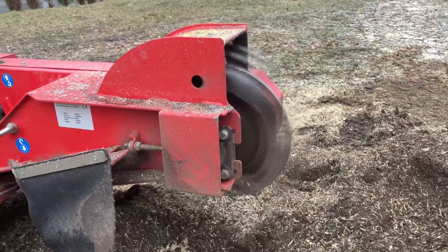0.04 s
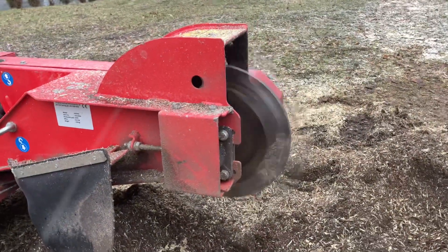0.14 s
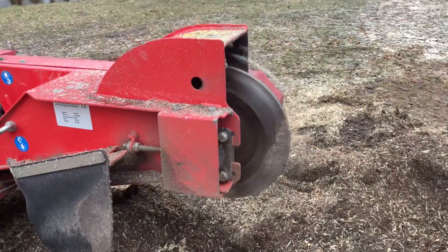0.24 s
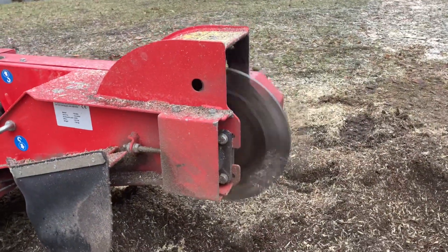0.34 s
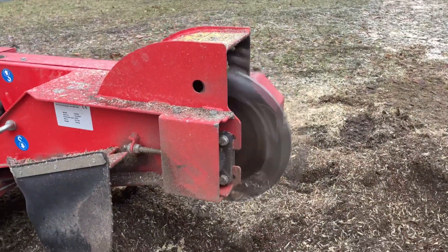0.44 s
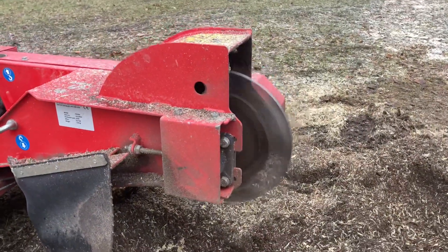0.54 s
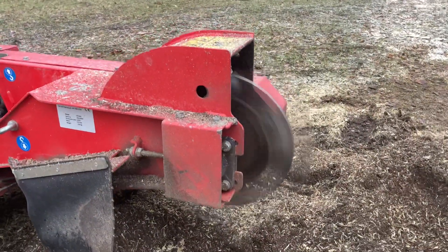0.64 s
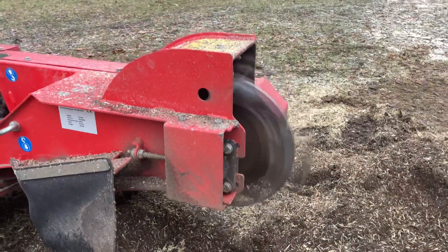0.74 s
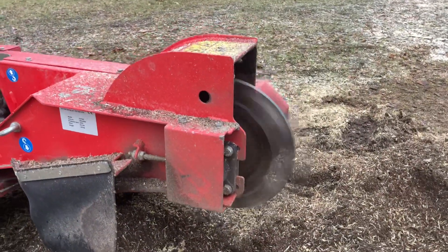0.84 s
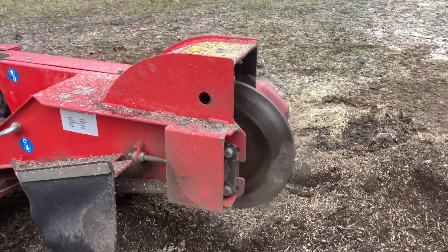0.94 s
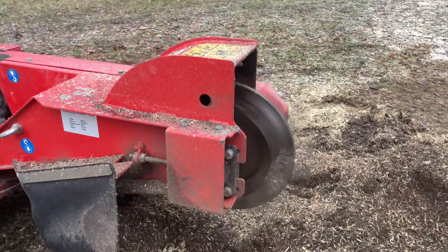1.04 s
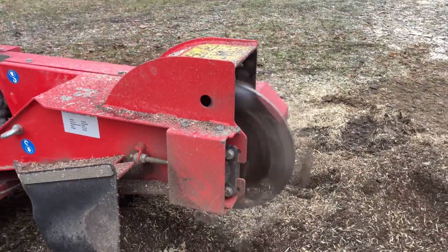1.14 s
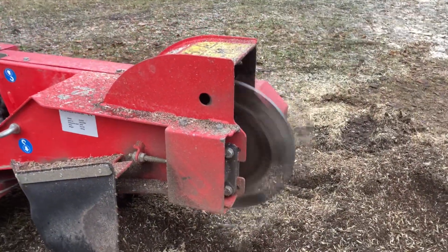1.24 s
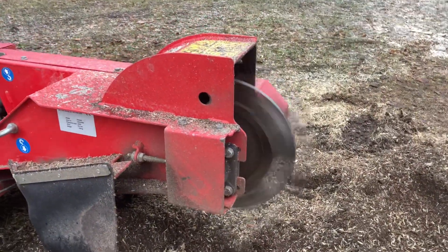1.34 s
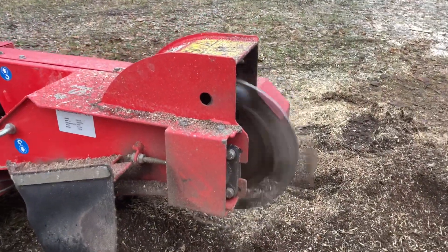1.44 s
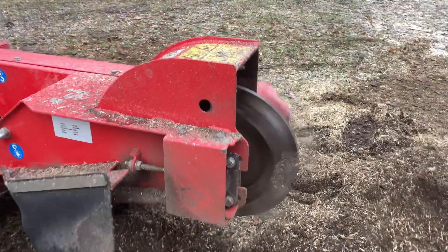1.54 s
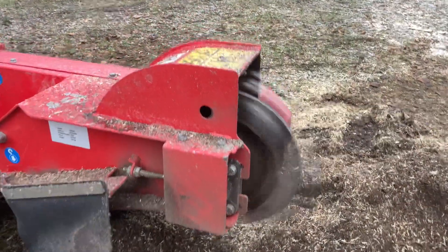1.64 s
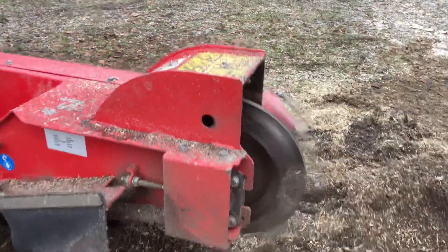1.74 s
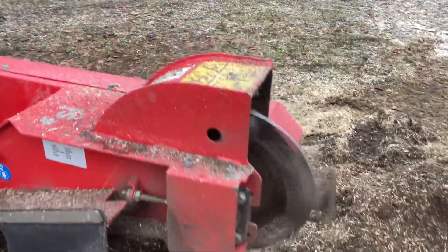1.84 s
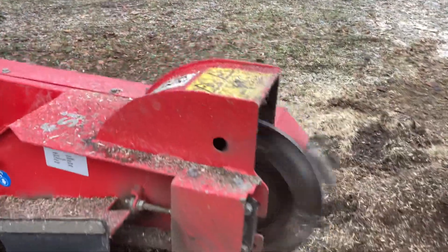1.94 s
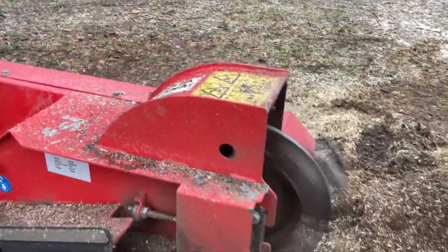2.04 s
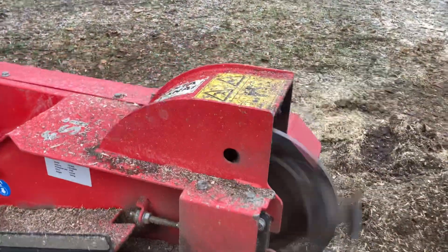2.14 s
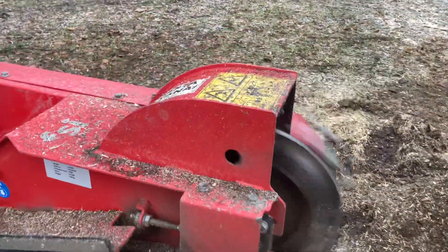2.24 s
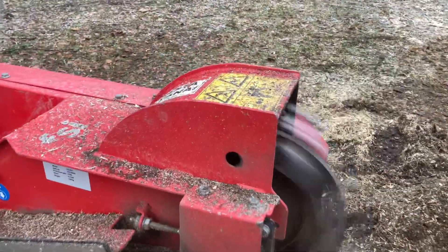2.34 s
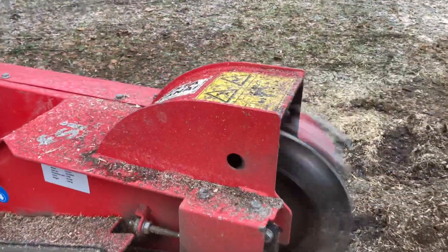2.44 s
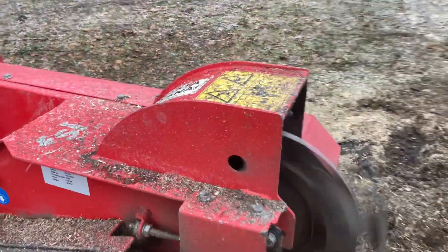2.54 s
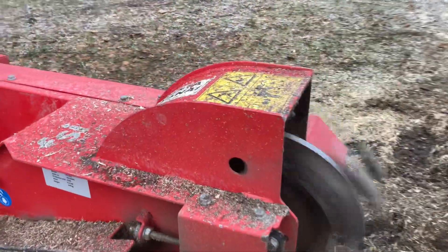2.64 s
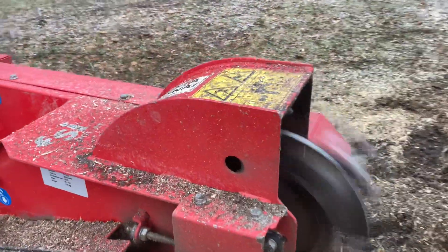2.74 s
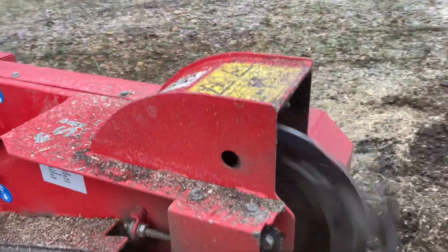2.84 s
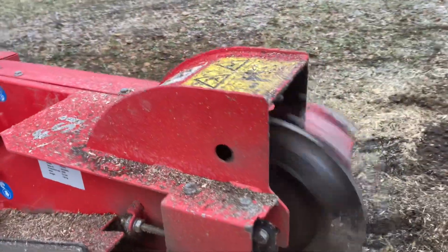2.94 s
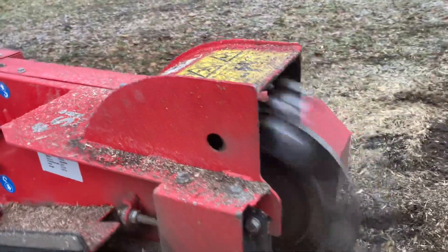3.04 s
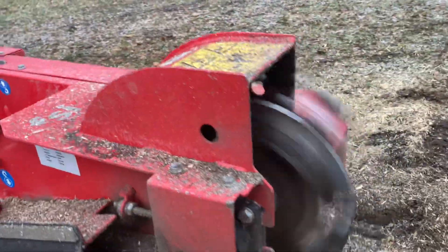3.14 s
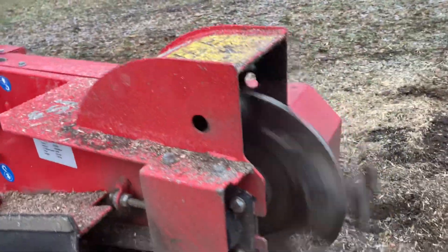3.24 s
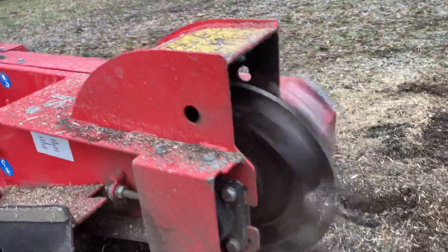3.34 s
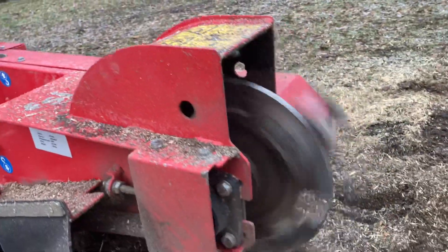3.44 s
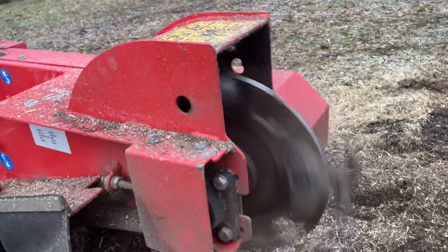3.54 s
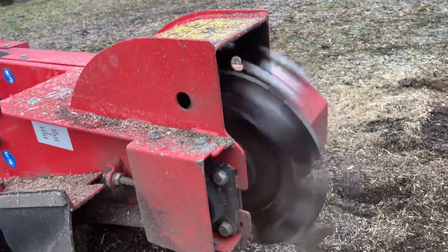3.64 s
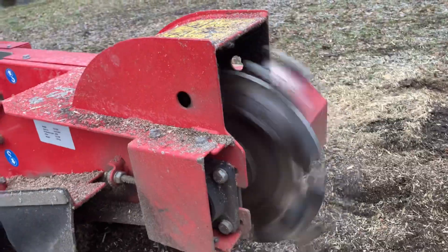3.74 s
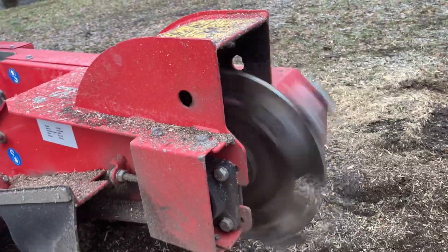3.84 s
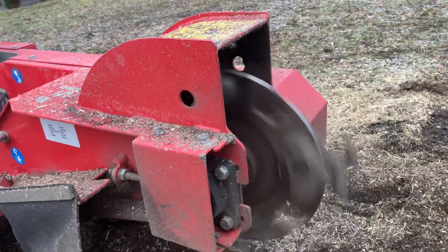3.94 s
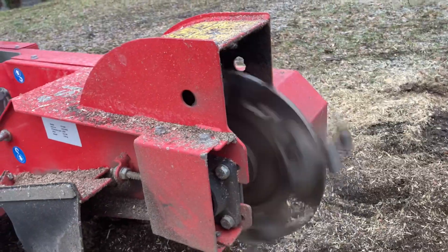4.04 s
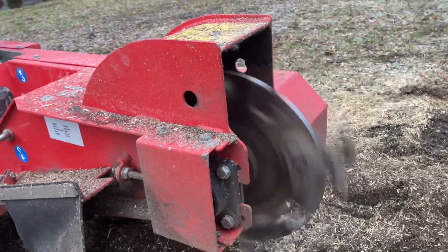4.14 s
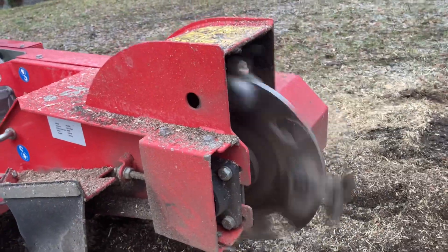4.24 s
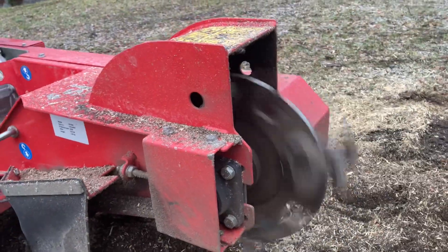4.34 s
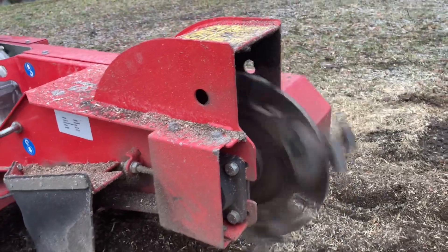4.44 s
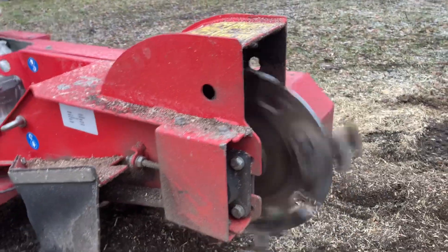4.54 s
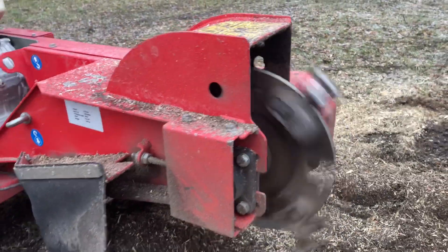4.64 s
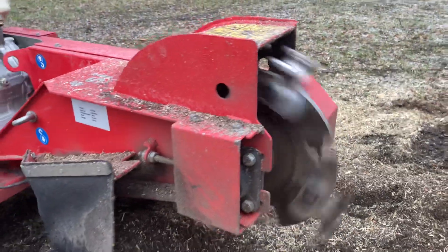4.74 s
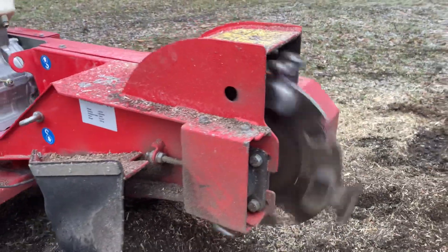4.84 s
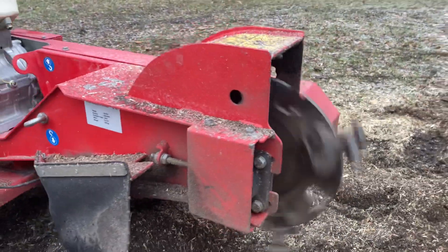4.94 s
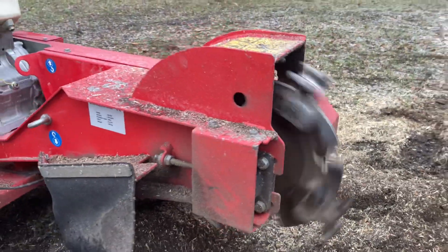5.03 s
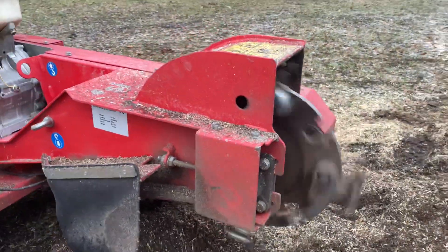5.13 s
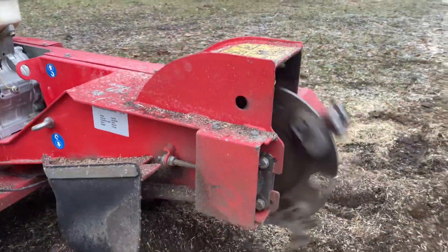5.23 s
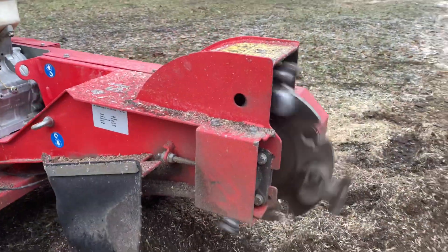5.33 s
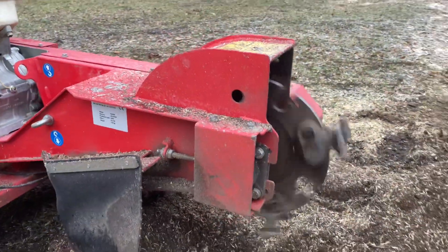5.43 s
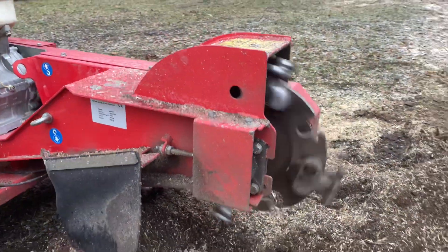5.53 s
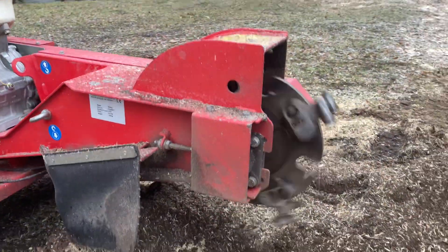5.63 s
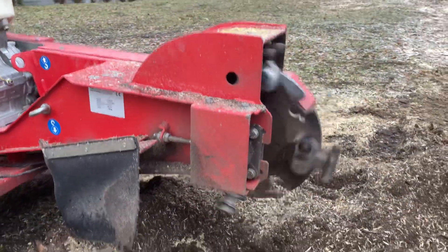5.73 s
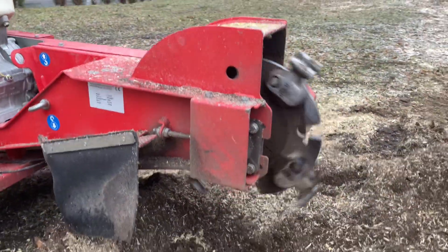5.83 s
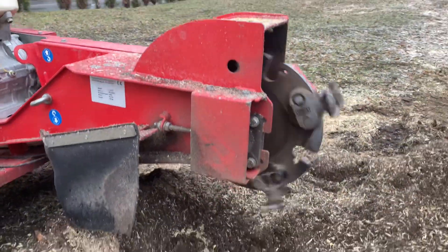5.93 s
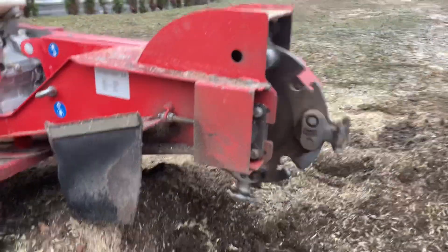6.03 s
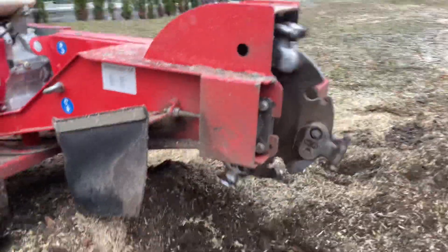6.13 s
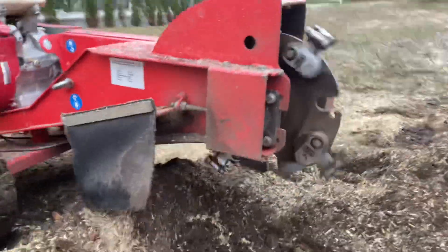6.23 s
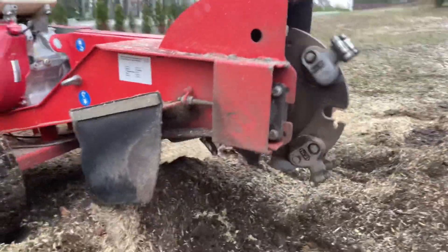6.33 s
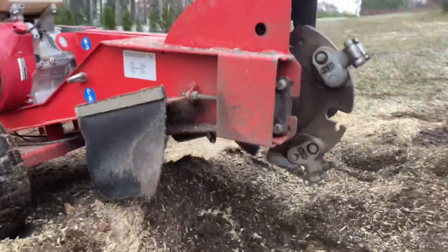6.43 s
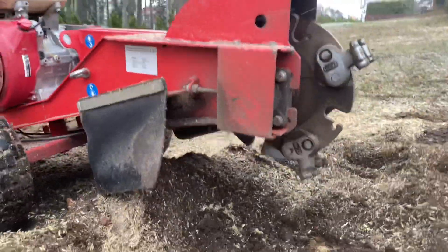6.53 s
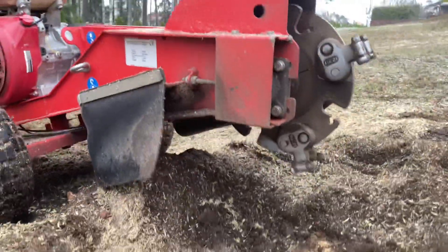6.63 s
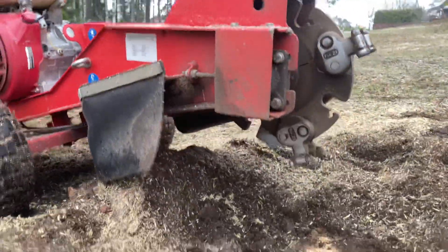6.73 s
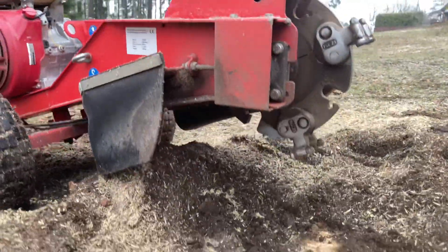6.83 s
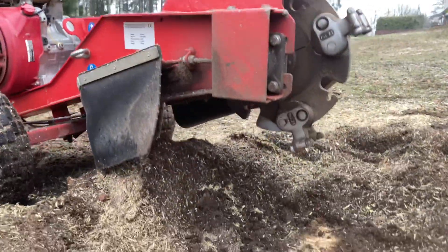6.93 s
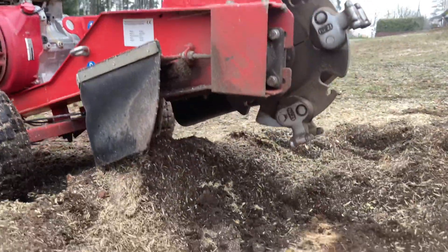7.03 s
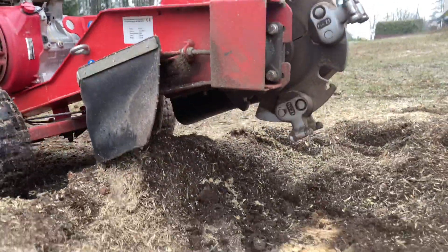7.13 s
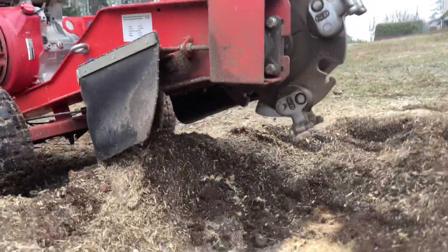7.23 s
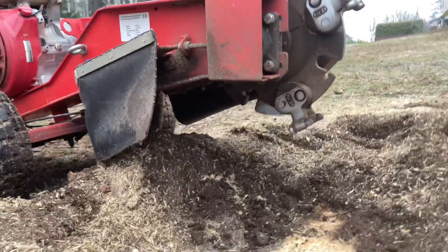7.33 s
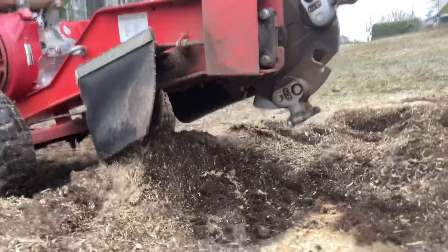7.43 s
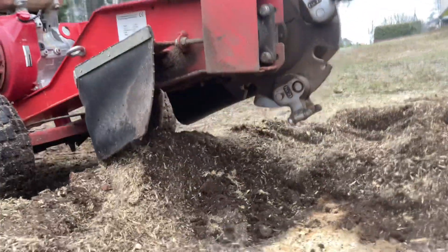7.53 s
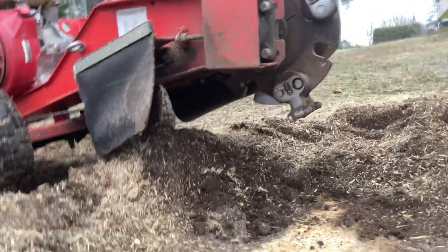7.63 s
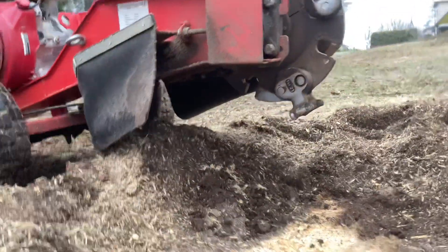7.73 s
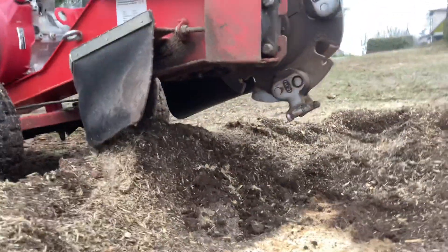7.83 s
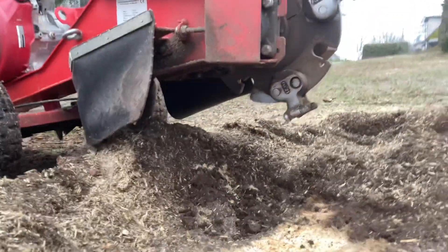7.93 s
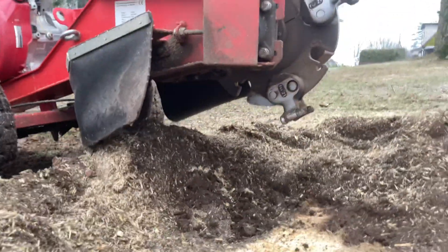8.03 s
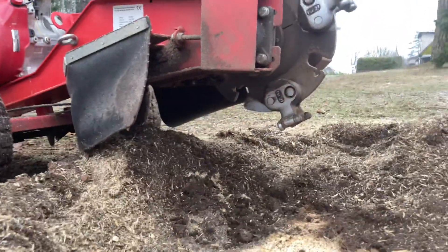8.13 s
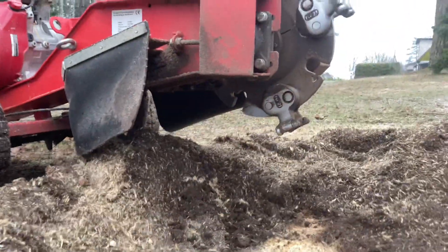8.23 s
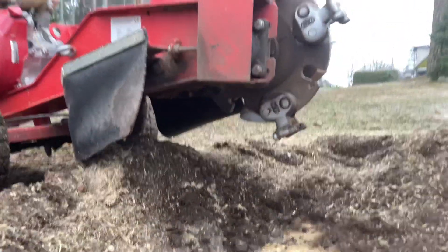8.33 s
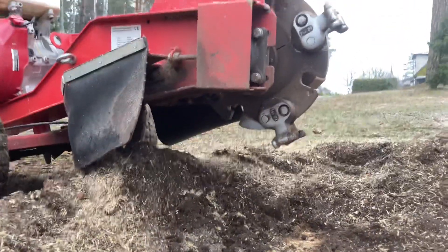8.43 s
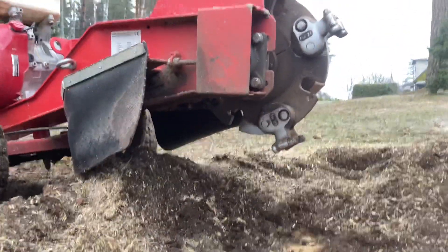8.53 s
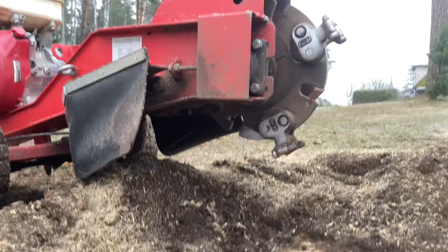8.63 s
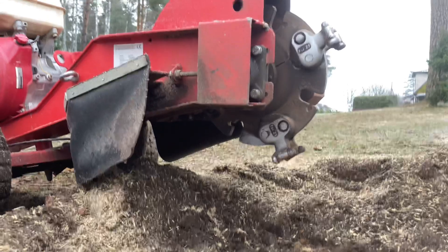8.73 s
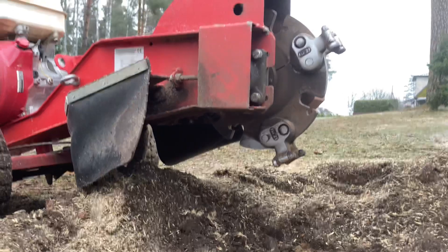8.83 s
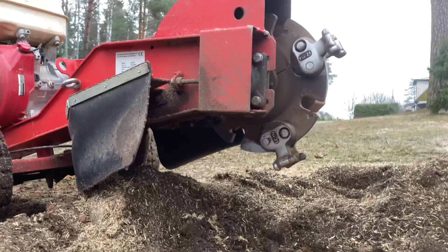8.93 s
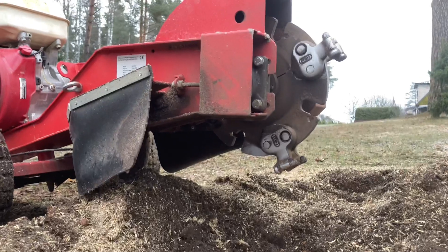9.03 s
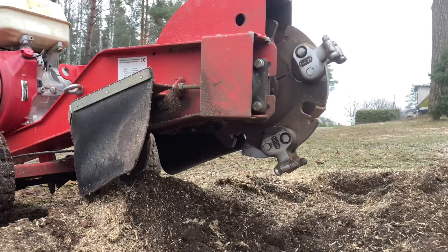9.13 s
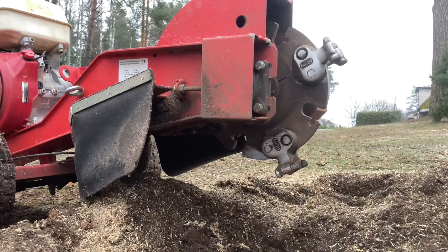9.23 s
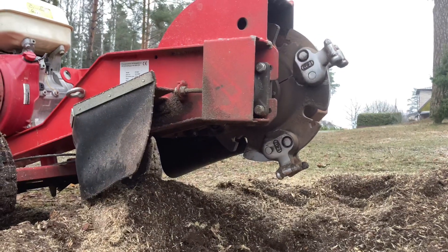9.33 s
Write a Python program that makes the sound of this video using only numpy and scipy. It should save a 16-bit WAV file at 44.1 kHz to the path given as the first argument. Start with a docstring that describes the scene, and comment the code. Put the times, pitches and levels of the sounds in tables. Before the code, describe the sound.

A petrol stump grinder chews into wood, spraying chips, then cuts out, its wheel knocking slower while the engine chuffs to a stop outdoors.

```python
"""A petrol stump grinder, heard from beside its cutter wheel, bites into a stump and sprays chips at its guard.
The ignition is cut: the wheel's knocks spread apart, the single cylinder chuffs and hisses through slower strokes,
and a freewheeling pulley whirs on over the low rumble of the garden.
Rotations are sums of harmonics; cuts, knocks, chips and gas are shaped noise, clicks and small rings.
The noise layers are coloured and spread over two microphone ports; the tones reach both ports alike."""
import sys
import numpy as np
from scipy import signal
from scipy.fft import rfft, irfft, next_fast_len
from scipy.io import wavfile
from scipy.ndimage import uniform_filter1d, map_coordinates

SR = 44100
rng = np.random.default_rng(int(sys.argv[2]) if len(sys.argv) > 2 else 0)


def transcribe(signal):
    """Save signal, clipped to [-1, 1], as a 16-bit WAV file at the path in sys.argv[1]."""
    frames = np.atleast_2d(signal).T
    limited = np.clip(frames, -1, 1)
    pcm = np.round(limited * 32767).astype(np.int16)
    wavfile.write(sys.argv[1], SR, pcm)


N = 413216
T = np.arange(N) / SR
FIRST_BITE_S, IGNITION_OFF_S = 0.627, 4.0
UNPOWERED_S = np.maximum(T - IGNITION_OFF_S, 0)  # time since the ignition was cut
CLICK_LIFT_DB = 22  # lifts one-sample clicks, which the colouring spreads out in time

# slowing by friction: moment of one completed cycle [s], engine cycles a second [1/s],
# moment the drag sets in [s], cycles a second lost each second [1/s^2]
COAST = (4.945, 11.4, 5.2, 3.57)
# the slowing wheel knocks once a turn: t [s], strength [dB]
KNOCKS = [(4.04, -12.5), (4.112, -12), (4.217, -9.5), (4.294, -5.5), (4.374, -2.5), (4.465, -1.5),
          (4.572, -10), (4.687, -10), (4.81, -11.5), (4.943, -37)]
# gas spitting past the two valves: t [s], first valve [dB], second valve [dB]
SPITS = [(5.4797, -41, -47), (5.587, -38, -46), (5.6903, -43, -48), (5.7995, -51, -57), (5.912, -53, -49),
         (6.0027, -34.5, -56), (6.1268, -32.5, -34), (6.256, -34.5, -35), (6.396, -34, -36.5),
         (6.545, -38, -35.5), (6.705, -43, -35.5), (6.885, -37, -35), (7.0864, -38, -37)]
# spectrum of torn and jolted wood: f [Hz], relative level per Hz [dB]
WOOD = [(30, -35), (90, -14.5), (190, -0.5), (350, -2), (460, -2.5), (620, 0), (760, -2.5), (1100, -8.5),
        (1800, -12), (3000, -17), (6000, -26)]
# spectrum of flung chips and grit: f [Hz], relative level per Hz [dB]
CHIPS = [(200, -37), (900, 2.5), (2200, -2), (3000, -1), (4000, 3.5), (5500, 0.5), (7500, 0), (10000, 1),
         (13000, -11), (16000, -17)]
# spectrum of dull bumps: f [Hz], relative level per Hz [dB]
BUMP = [(25, -29), (65, -1), (100, 5.5), (160, -2.5), (270, -8.5), (450, -17), (1200, -69)]
# ringing of the wheel's guard: f [Hz], width [Hz], lift [dB]
GUARD = [(440, 55, 4.5), (487, 21, 2), (588, 45, 9), (662, 29, 8), (833, 46, 5.5), (1123, 45, 9),
         (1210, 40, 3), (1638, 36, 5.5), (1749, 41, 8.5), (2140, 45, 6.5), (2440, 74, 6), (2710, 54, 6.5)]
# ringing of the engine's covers: f [Hz], width [Hz], lift [dB]
COVERS = [(572, 73, 4.7), (993, 24, 8.1), (1247, 165, 6.2), (1650, 22, 9.1), (2127, 23, 8.9), (2363, 39, 8),
          (2620, 41, 8.3), (3990, 67, 6.5), (4700, 53, 9.5)]


def amp(db):
    """Decibels to gain."""
    return 10 ** (np.asarray(db) / 20)


def unit(x):
    """Scaled to rms 1."""
    return x / np.sqrt(np.mean(x ** 2) + 1e-20)


def along(points, hz):
    """(Hz, value) points read on a log frequency axis."""
    f, v = np.transpose(points)
    return np.interp(np.log(hz + 1), np.log(f + 1), v)


def curves(rows):
    """One value per sample for each column after the time."""
    s, *cols = np.transpose(rows)
    return [np.interp(T, s, c) for c in cols]


def wobble(rate):
    """A smooth random curve with this many knots a second."""
    coarse = T[::32]
    knots = rng.standard_normal(int(N * rate / SR) + 4)
    return np.interp(T, coarse, map_coordinates(knots, [coarse * rate], order=2))


def noise():
    """Two unrelated white noises."""
    return rng.standard_normal((2, N))


def heard(pair, spectrum, modes=()):
    """Colours two excitations with one causal filter, rings them by modes and spreads them over two ports."""
    # likeness of the two microphone ports: f [Hz], likeness [0-1]
    alike = [(100, 0.89), (600, 0.87), (1200, 0.6), (2000, 0.42), (4000, 0.25), (5800, 0.27), (7000, 1),
             (16000, 1)]
    # left-right balance: f [Hz], left minus right [dB]
    lean = [(100, 1), (400, 0), (700, 1.5), (1200, 4.5), (2200, 3.5), (4500, 1.5), (8000, -0.5)]
    # phase by which left leads: f [Hz], lead [rad]
    lead = [(0, 0), (1200, .8), (2000, 1.5), (3000, 3), (4400, 5.5), (5600, 3.1), (6900, 0), (16100, -12.5)]
    m = 2 * next_fast_len(N // 2 + 8192)
    hz = np.fft.rfftfreq(m, 1 / SR)
    db = along(spectrum, hz)
    for centre, width, lift in modes:
        db = db + lift / (1 + (2 * (hz - centre) / width) ** 2)
    # folding the cepstrum gives the minimum phase: no sound ahead of its cause
    cepstrum = irfft(np.log(unit(amp(db)) + 1e-6), m)
    colour = np.exp(rfft(2 * cepstrum[:m // 2], m) - cepstrum[0])
    a, b = rfft(pair, m) * colour
    turn = np.arccos(np.clip(along(alike, hz), 0, .99)) / 2
    common, opposed = a * np.cos(turn), b * np.sin(turn)
    port = amp(along(lean, hz) / 2) * np.exp(.5j * np.interp(hz, *np.transpose(lead)))
    return irfft([(common + opposed) * port, (common - opposed) / port], m)[:, :N]


def swells(times, levels_db, rise, t60):
    """The envelope of bursts that rise and die away (s), added by power."""
    t = np.arange(SR // 2) / SR
    shape = (1 - np.exp(-(t / rise) ** 2)) * amp(-60 * t / t60)
    power = np.zeros(N + SR)
    for s, db in zip(times, levels_db):
        power[round(s * SR):][:len(t)] += (amp(db) * shape / shape.max()) ** 2
    return np.sqrt(power[:N])


def grains(rate, spread_db, life):
    """Tiny noisy impacts at random times, rate a second: most are faint, a few stand out."""
    sizes = amp(spread_db * np.minimum(rng.exponential(size=N), 5)) ** 2
    hits = (rng.random(N) < rate / SR) * sizes
    power = signal.lfilter([1], [1, -np.exp(-1 / (life * SR))], hits)
    return unit(noise() * np.sqrt(power))


def pings(rate, pitch_hz, spread, periods, spread_db):
    """Small pieces, rate a second, that each ring briefly at a pitch and place of their own."""
    count = int(rate * N / SR)
    when, size, place = rng.random((count, 3)).T
    hz = np.clip(pitch_hz * np.exp(spread * rng.standard_normal((count, 1))), 300, 14000)
    t = T[:SR // 100]
    strength = amp(spread_db * np.minimum(-np.log(1 - size), 4))[:, None] * np.sqrt(hz)
    rings = strength * np.sin(2 * np.pi * hz * t) * np.exp(-hz * t / periods)
    index = ((when * N).astype(int)[:, None] + np.arange(len(t))).ravel()
    pair = []
    for side in (np.cos, np.sin):
        placed = rings * side(2 * np.pi * place)[:, None]
        pair.append(np.bincount(index, placed.ravel(), N)[:N])
    return unit(np.array(pair))


def patchy(pair, depth_db):
    """Gives every instant a colour of its own: random gain over patches of time and frequency."""
    z = signal.stft(pair, nperseg=512)[2]
    field = uniform_filter1d(rng.standard_normal(z.shape[1:]), size=5, axis=0)
    field = uniform_filter1d(field, size=5, axis=1)
    return unit(signal.istft(z * amp(depth_db * unit(field)), nperseg=512)[1][:, :N])


def beat(turns, sharpness):
    """A gate of rms 1 that jumps open once a turn and dies away."""
    return unit(np.exp(-sharpness * (turns % 1)))


def orders(turns, table, rough, drift):
    """Harmonics of a rotation, each unsteady in strength and phase."""
    total = 0
    for k, db in table:
        strength = amp(db) * (1 + rough * wobble(22.03))
        phase = 2 * np.pi * (round(k) * turns + rng.random()) + drift * k * wobble(9)
        total = total + strength * np.sin(phase)
    return total * np.sqrt(2)


def loaded(law):
    """A layer's level in dB: it grows with the load and fades once the ignition is off."""
    # how hard the teeth cut: t [s], load [dB]
    load = [(0.55, -26.5), (0.69, -24.5), (0.9, -25), (1.14, -19.5), (2.15, -20), (2.88, -26), (2.89, -24),
            (3.45, -28), (3.6, -25.5), (3.95, -24)]
    full_db, slope, fade = law
    load_db, = curves(load)
    return full_db + slope * (load_db - load_db.max()) - fade * UNPOWERED_S


def slowing(motion):
    """A rate that holds, then falls to rest under steady friction."""
    _, rate, drag_s, drag = motion
    return np.maximum(rate - drag * np.maximum(T - drag_s, 0), 0)


def turned(rate, whole_s):
    """Turns made at this rate, counted from the moment whole_s."""
    turns = np.cumsum(rate) / SR
    return turns - np.interp(whole_s, T, turns)


def passes(turns, from_s):
    """The times after from_s at which a turn is completed."""
    return T[(np.diff(np.floor(turns), prepend=np.inf) > 0) & (T > from_s)]


def stroke_levels(times):
    """Rattle and chuff dB of strokes at these times."""
    # strength of the unfired strokes: t [s], rattle [dB], chuff before its offsets [dB]
    strengths = [(4.95, -36.5, -32.5), (5.45, -31, -27.5), (5.9, -38.5, -33), (6.13, -42, -34),
                 (7.3, -42.5, -41), (7.6, -65, -47)]
    s, *cols = np.transpose(strengths)
    return [np.interp(times, s, c) for c in cols]


def cutter(teeth):
    """Belt-driven teeth hum, tear the wood into splinters and fling chips at the guard."""
    # harmonics of the teeth: multiple of the tooth rate [1], relative level [dB]
    tooth_orders = [(1, -21), (2, -2.5), (3, -5.5), (4, -6.5), (5, -10), (6, -7.5), (7, -7)]
    # the three laws: base at full load [dB], slope [dB per dB of load], fade after the ignition cut [dB/s]
    hum_law = (-26, 1.48, 21)
    tearing_law = (-20, 1, 12)
    chip_law = (-27.5, 0.95, 11.6)
    wheel_clear_s = 4.97
    wood_db, chips_db = loaded(tearing_law), loaded(chip_law)
    going_in = np.clip((T - FIRST_BITE_S) / 0.02, 0, 1)
    biting = going_in * np.clip((wheel_clear_s - T) / 0.19 + .5, 0, 1)
    hum = amp(loaded(hum_law)) * orders(teeth, tooth_orders, rough=0.16, drift=0.076)

    tearing = amp(wood_db + 0.7 * wobble(30)) * beat(teeth, sharpness=1.0) * patchy(noise(), depth_db=2)
    splinters = pings(rate=750, pitch_hz=2400, spread=0.3, periods=7.0, spread_db=2.1)
    splinters = amp(chips_db - 5.5) * splinters

    flung = 0.63 * noise() + 0.7 * grains(rate=600, spread_db=2.2, life=0.001)
    flung = flung + .35 * pings(rate=700, pitch_hz=5936, spread=.45, periods=22, spread_db=1.5)
    spray_level = amp(chips_db + 3.5 + 1.25 * wobble(45))
    spray = spray_level * beat(teeth / 2, sharpness=0.32) * flung  # surges at every second tooth
    return hum + heard(biting * tearing, WOOD, GUARD) + heard(biting * (spray + splinters), CHIPS, GUARD)


def chops(teeth):
    """The wheel skims the stump, then each tooth strikes it with a short crack, deep and shallow cuts in turn."""
    # a tooth striking wood: f [Hz], relative level per Hz [dB]
    crack_spectrum = [(300, -15), (900, -4), (1700, -2.5), (2700, 1.5), (4200, -4), (5500, -17),
                      (10000, -5), (16000, -29)]
    # strength of the deeper cuts before scatter: t [s], level [dB]
    depth_levels = [(0.627, -13.5), (0.71, -17), (0.9, -22), (1.25, -17.5), (2.1, -28), (2.9, -39),
                    (3.45, -36), (3.65, -19), (4.0, -29), (4.5, -26)]
    # teeth meeting hard wood: t [s], peak level [dB]
    hard_chops = [(1.1104, -16), (1.221, -13), (1.249, -15), (1.3036, -13), (1.332, -17), (1.528, -17)]
    # skims before the bite: t [s], level before the tooth gate [dB], t60 [s]
    grazes = [(0.0, -26, 0.32), (0.103, -31, 0.18)]
    shallow_tooth_db, scatter_db = -8.5, 1
    times = passes(teeth - np.interp(FIRST_BITE_S, T, teeth), FIRST_BITE_S - 1 / SR)
    times = times[times < depth_levels[-1][0]]
    scatter = np.clip(rng.standard_normal(N)[:len(times)], -2, 2)
    levels_db = np.interp(times, *np.transpose(depth_levels)) + scatter_db * scatter
    levels_db = levels_db + shallow_tooth_db * (np.arange(len(times)) % 2)
    s, db = np.vstack([np.c_[times, levels_db], hard_chops]).T
    cracks = swells(s, db, rise=0.0005, t60=0.022)
    skims = sum(swells([s], [db], rise=0.0013, t60=t60) for s, db, t60 in grazes)
    skims = skims * beat(2 * teeth, sharpness=1.7)
    return heard((cracks + skims) * noise(), crack_spectrum, GUARD)


def knocks():
    """Hard bites, then each turn of the slowing wheel, jolt the guard and throw grit; the turns make the arm boom."""
    # teeth catching hard: t [s], strength [dB]
    bites = [(3.546, -5), (3.654, -9), (3.698, -4), (3.809, -7.5), (3.974, -6.5)]
    # boom of the cutter arm: f [Hz], relative level per Hz [dB]
    boom_spectrum = [(60, -24), (150, -7), (205, 0.5), (245, 1.5), (290, 3), (380, -4), (520, -23),
                     (1200, -52)]
    grit_db, boom_db = -23.5, -21  # levels for a knock of 0 dB
    turns, turns_db = np.transpose(KNOCKS)
    s, db = np.vstack([bites, KNOCKS]).T
    jolts = swells(s, db - 13.5, rise=0.0038, t60=0.15) * noise()
    grit = swells(s, grit_db + 0.46 * db, rise=0.0034, t60=0.24)
    grit = grit * grains(rate=1600, spread_db=2.0, life=0.00097)
    boom = swells(turns, boom_db + 0.36 * turns_db, rise=0.0026, t60=0.44) * noise()
    return heard(jolts, WOOD, GUARD) + heard(grit, CHIPS) + heard(boom, boom_spectrum)


def arm():
    """Each knock of the slowing wheel rings the cutter arm's modes, a little differently every time."""
    # modes of the cutter arm: f before scatter [Hz], relative level before scatter [dB], t60 [s]
    modes = [(208, 0, 0.14), (285, 0.5, 0.17), (385, -8, .08), (495, -8.5, .08), (588, 1, 0.11),
             (663, -12, 0.065)]
    arm_db, arm_slope = -22.5, 0.25  # level for a knock of 0 dB; dB per dB of knock
    t = T[:SR // 4]
    onset = 1 - np.exp(-(t / 0.0045) ** 2)
    out = np.zeros(N)
    for s, db in KNOCKS:
        ring = 0
        for hz, mode_db, t60 in modes:
            decay = amp(mode_db + rng.normal(0, 1.8) - 60 * t / t60)
            ring = ring + decay * np.sin(2 * np.pi * (hz * rng.normal(1, 0.017) * t + rng.random()))
        out[round(s * SR):][:len(t)] += amp(arm_db + arm_slope * db) * onset * ring
    return out


def clanks():
    """Hard steel clanks, short bursts of noise and small rings, each followed by a weaker chatter."""
    # clanks of steel: t [s], strike level [dB]
    clank_table = [(0.641, -19), (0.665, -15.5), (1.6137, -18), (3.544, -18.5), (3.976, -16), (4.943, -31),
                   (5.8044, -42)]
    # struck steel: f [Hz], relative level per Hz [dB]
    steel_spectrum = [(400, -21), (1000, 6.5), (1800, 7), (2700, 3), (4000, -1.5), (6000, -16), (10000, 8),
                      (16000, -21)]
    s, db = np.transpose(clank_table)
    steel = pings(rate=2900, pitch_hz=2880, spread=0.415, periods=61, spread_db=-2.0)
    steel = 0.53 * noise() + .6 * steel
    strikes = swells(s, db, rise=0.00061, t60=0.037)
    chatter = swells(s, db - 12, rise=0.016, t60=0.12)
    return heard((strikes + chatter) * steel, steel_spectrum, COVERS)


def brushing():
    """Lifted off the stump, the coasting wheel brushes through loose chips: patchy noise in soft swells."""
    # brushes of the teeth: t [s], peak level [dB]
    brushes = [(4.905, -35), (4.955, -35), (5.03, -38), (5.12, -38), (5.203, -44), (5.288, -36),
               (5.38, -43)]
    # brushed chips: f [Hz], relative level per Hz [dB]
    brush_spectrum = [(600, -22), (1500, -10), (2600, 13), (4500, 1), (5500, -13), (7000, -15),
                      (12000, -20), (16000, -28)]
    chips = 0.6 * noise() + 0.8 * grains(rate=700, spread_db=1.6, life=0.001)
    chips = patchy(chips, depth_db=3.5)
    return heard(swells(*np.transpose(brushes), rise=0.0073, t60=0.2) * chips, brush_spectrum)


def engine(cycles):
    """Exhaust throb, with valve gear and fan clattering at each turn of the crank, twice a cycle."""
    # strength of the exhaust before its offset and fade: t [s], level [dB]
    throb_levels = [(0.1, -24.5), (0.32, -24), (1.26, -21.5), (3.37, -27), (3.95, -25.5)]
    # exhaust harmonics: multiple of the cycle rate [1], relative level [dB]
    exhaust_orders = [(2, 0), (3, -37), (4, -4), (5, -1), (6, -19.5), (7, -42), (8, -45), (10, -24),
                      (13, -12.5)]
    # clatter: base at full load [dB], slope [dB per dB of load], fade after the ignition cut [dB/s]
    clatter_law = (-26, 0.32, 26)
    # clatter: f [Hz], relative level per Hz [dB]
    clatter_spectrum = [(30, -41), (90, -7.5), (160, 5.5), (300, -9), (480, 1), (800, -2), (1300, -3.5),
                        (2300, -10), (3000, -14.5), (4200, -13.5), (5500, -15.5), (9000, -19),
                        (12000, -20.5), (16000, -30)]
    throb_db, throb_fade_db_per_s = -5, 57
    exhaust_db = curves(throb_levels)[0] + throb_db - throb_fade_db_per_s * UNPOWERED_S
    throb = amp(exhaust_db) * orders(cycles, exhaust_orders, rough=0.019, drift=0.022)
    clatter = amp(loaded(clatter_law)) * beat(2 * cycles, sharpness=0.51) * noise()
    return throb + heard(clatter, clatter_spectrum)


def chuffs(cycles):
    """With the spark gone, the piston pumps a few puffs through the silencer each cycle, harder early on."""
    # gas puffs in a cycle: share of the cycle [1], relative level [dB]
    puff_table = [(0.24, -0.5), (.6, 1), (.94, -6.5)]
    # puffs through the silencer: f [Hz], relative level per Hz [dB]
    chuff_spectrum = [(25, -35), (50, -5.5), (85, 0.5), (130, -1.5), (200, -23), (400, -36), (1500, -48),
                      (6000, -83)]
    starts = passes(cycles, IGNITION_OFF_S)
    levels_db = stroke_levels(starts)[1] + 6 * np.maximum(COAST[0] - starts, 0)
    puffs = np.zeros((2, N))
    for share, db in puff_table:
        at = ((starts[:-1] + share * np.diff(starts)) * SR).astype(int)
        # one-sample clicks, lifted 27 dB because the colouring spreads them out
        puffs[0, at] = amp(levels_db[:-1] + db + 27 + rng.normal(0, 1, len(at)))
    return heard(puffs, chuff_spectrum)


def coasting(cycles):
    """Unfired cycles rattle the covers, gas spits past two valves; the settling machine scrapes and squeaks."""
    # rattling covers: f [Hz], relative level per Hz [dB]
    rattle_spectrum = [(100, 0.5), (300, 5.5), (480, -25), (590, 11.5), (780, -2.5), (1200, -5.5),
                       (2100, -6.5), (3000, -11), (4200, -7.5), (6000, -14.5), (10000, -18), (16000, -31)]
    # spitting gas: f [Hz], relative level per Hz [dB]
    spit_spectrum = [(500, -11), (2000, -9), (4000, 6), (5500, 3), (7500, 4.5), (11000, 6), (16000, -8)]
    # short scrapes of metal and grit: t [s], peak level [dB]
    scrapes = [(4.655, -36), (7.2936, -38.5), (7.302, -33), (7.329, -44), (7.362, -39.5), (7.7162, -49.5),
               (7.866, -51), (8.4203, -45), (8.547, -55), (8.978, -51)]
    # squeaks of steel before their flutter: t [s], f [Hz], level [dB], t60 [s]
    squeak_table = [(7.301, 5900, -41, 0.065), (7.303, 6310, -42, 0.065), (7.55, 1700, -48, .2),
                    (8.345, 1700, -48, 0.22), (8.4, 1720, -43, .15), (8.419, 7714, -56, .3),
                    (8.67, 1690, -52, .25), (8.99, 1670, -50, 0.25)]
    spit_share = 0.13  # the second valve follows by this share of the time between spits
    strokes = passes(cycles, from_s=4.9)
    loose = 0.8 * noise() + 1.15 * grains(rate=300, spread_db=2.4, life=.002)
    rattle = swells(strokes, stroke_levels(strokes)[0], rise=0.0027, t60=0.45) * loose

    first, first_db, second_db = np.transpose(SPITS)
    second = first + spit_share * np.gradient(first)
    bursts = swells(np.r_[first, second], np.r_[first_db, second_db], rise=0.0023, t60=0.047)
    bursts = bursts + swells(*np.transpose(scrapes), rise=0.0019, t60=0.057)
    hiss = 0.65 * noise() + 0.7 * grains(rate=800, spread_db=1.6, life=0.0008)
    hiss = hiss + 0.3 * pings(rate=1400, pitch_hz=3500, spread=0.3, periods=14, spread_db=1)
    spits = bursts * patchy(hiss, depth_db=4.5)

    squeaks = 0
    for s, hz, db, t60 in squeak_table:
        tone = np.sin(2 * np.pi * hz * T + 0.97 * wobble(110))
        squeaks = squeaks + swells([s], [db], rise=0.0042, t60=t60) * tone
    squeaks = squeaks * amp(2.9 * wobble(45))
    return heard(rattle, rattle_spectrum, COVERS) + heard(spits, spit_spectrum, COVERS) + squeaks


def loose_parts(cycles):
    """Valve gear clacks between the strokes; loose covers shake with each spit of gas and tick ever more softly."""
    # loose covers and linkage as the machine settles: t [s], peak level [dB], t60 [s]
    rattle_table = [(7.5296, -55, .09), (7.548, -45, 0.089), (7.5701, -45, 0.078), (7.6384, -45, 0.13),
                    (7.6858, -44, 0.15), (8.03, -44.5, 0.087), (8.0784, -51, .15), (8.3638, -48, 0.2),
                    (8.414, -48, 0.25), (8.5473, -46.5, 0.41), (8.828, -49, 0.14)]
    # loose parts: f [Hz], relative level per Hz [dB]
    tick_spectrum = [(300, -18), (900, 6.5), (1900, 3.5), (3000, 0.5), (4500, -9), (6000, -6.5),
                     (9000, -15), (16000, -18)]
    from_s, ticks_per_s, loudest_db, fade_db_per_s = 5.4, 26, -37, 6
    rocker_share, rocker_db = .74, -47  # place of the clack in the cycle; its level
    span_s = T[-1] - from_s
    place, size = rng.random((int(ticks_per_s * span_s), 2)).T
    after = place * span_s
    ticks_db = loudest_db - fade_db_per_s * after - 8 * size
    ticks = swells(from_s + after, ticks_db, rise=0.00084, t60=0.098)
    rockers = passes(cycles - rocker_share, from_s)
    clacks = swells(rockers, np.full(len(rockers), rocker_db), rise=0.0015, t60=0.18)
    rattles = sum(swells([s], [db], rise=0.00094, t60=t60) for s, db, t60 in rattle_table)
    spit_s, _, spit_db = np.transpose(SPITS)
    shaken = swells(spit_s, spit_db - 6, rise=0.004, t60=0.13)
    contacts = 0.6 * noise() + 0.8 * grains(rate=450, spread_db=1.8, life=0.0012)
    contacts = contacts + 0.4 * pings(rate=500, pitch_hz=4100, spread=0.2, periods=22, spread_db=1.5)
    envelope = np.sqrt(ticks ** 2 + clacks ** 2 + rattles ** 2 + shaken ** 2)
    return heard(envelope * contacts, tick_spectrum, COVERS)


def pulley():
    """A freewheeling pulley's harmonics slide down through the resonances of the frame."""
    # pulley harmonics: multiple of its turns [1], relative level [dB]
    whir_orders = [(6, -0.5), (8, -10), (9, 5), (10, 3), (11, 0.5), (12, 4), (13, 2), (14, -5), (15, -1.5),
                   (16, -1.5), (17, -1.5), (18, -1), (20, -0.5), (24, -10)]
    # steel frame: f [Hz], width [Hz], relative gain [dB]
    frame_modes = [(234, 36, -7.5), (365, 26, 0), (493.5, 22, -2.5), (561, 46, 0.5), (598, 23, 0.5),
                   (685, 14, 2.5), (1010, 32, -17)]
    turns_per_s, slows_s = 57.78, 9.0  # rate until the ignition is cut; time constant of its fall
    level_db, fade_db_per_s = -35, 3
    rate = turns_per_s * np.exp(-UNPOWERED_S / slows_s)
    fade_in = np.minimum(UNPOWERED_S / 1.0, 1)  # over the first second without ignition
    level = fade_in * amp(level_db - fade_db_per_s * UNPOWERED_S)
    whir = unit(orders(np.cumsum(rate) / SR, whir_orders, rough=0.36, drift=0.028))
    drive = whir + 2.0 * rng.standard_normal(N)
    f = np.fft.rfftfreq(N, 1 / SR)
    ring = 0
    for k, (c, w, gain_db) in enumerate(frame_modes):
        ring = ring + (-1) ** k * amp(gain_db) * 1j * f * w / (c * c - f * f + 1j * f * w)
    return level * unit(irfft(rfft(drive) * ring, N))


def squeal():
    """A thin, fluttering tone of rubbing steel lingers as the machine settles."""
    # squeal before its flutter: t [s], level [dB]
    squeal_levels = [(7.4, -75), (7.9, -62.5), (8.4, -65), (8.7, -63), (9.37, -64)]
    tone = np.sin(2 * np.pi * 1676 * T + 1.4 * wobble(80))  # around 1676 Hz
    return amp(curves(squeal_levels)[0] + 4.5 * wobble(22)) * tone


def shudder():
    """A short rubbing shudder close by: a run of unevenly timed slips, low and dull."""
    from_s, to_s, slips_per_s, shudder_db = 8.085, 8.168, 120, -30
    times = np.arange(from_s, to_s, 1 / slips_per_s)
    times = times + (rng.random(len(times)) - .5) / slips_per_s
    slips = np.zeros((2, N))
    slips[0, (times * SR).astype(int)] = amp(shudder_db + CLICK_LIFT_DB)
    return heard(slips, BUMP)


def garden():
    """Low outdoor rumble and a soft, fading rush of air, with dull bumps close by: a push, then a shudder."""
    # dull bumps: t [s], level of push and shudder [dB], t60 of the shudder [s]
    thuds = [(8.502, -39, .1), (8.829, -37, 0.11), (9.072, -29, 0.15), (9.212, -30.5, .12),
             (9.273, -32, 0.17)]
    # rumble before its wobble: t [s], level [dB]
    rumble_levels = [(5.0, -39), (6.1, -42), (7.3, -44.5), (7.8, -40), (9.37, -39)]
    # rumble: f [Hz], relative level per Hz [dB]
    rumble_spectrum = [(20, -29), (45, -1.5), (70, 4.5), (130, -5.5), (240, -3.5), (350, -13.5),
                       (600, -8.5), (1500, -52.5)]
    # rush of air: f [Hz], relative level per Hz [dB]
    air_spectrum = [(100, -2), (350, 3.5), (550, 3.5), (800, 5.5), (1200, -1.5), (1700, -4.5), (2500, -10),
                    (4500, -16), (6000, -22), (10000, -24), (16000, -40)]
    air_db, air_fade_db_per_s = -37.5, 2.5  # fades once the ignition is cut, as the pulley does
    bumps = sum(swells([s], [db], rise=0.0024, t60=t60) for s, db, t60 in thuds) * noise()
    for s, db, _ in thuds:
        bumps[0, round(s * SR)] += amp(db + CLICK_LIFT_DB)
    rumble = amp(curves(rumble_levels)[0] + 1.1 * wobble(16)) * noise()
    air_level = amp(air_db - air_fade_db_per_s * UNPOWERED_S + 1.3 * wobble(16))
    air = air_level * patchy(noise(), depth_db=2.5)
    return heard(bumps, BUMP) + heard(rumble, rumble_spectrum) + heard(air, air_spectrum, COVERS)


def scene():
    """Engine and wheel share one rotation, which drops quickly after the cut; the engine then coasts on to
    rest."""
    # the engine sags under load; speed before the ignition fall: t [s], engine cycles a second [1/s]
    speed = [(0, 28.5), (.9, 28.5), (1.2, 27.3), (1.6, 26.6), (2.35, 26), (2.85, 27.5), (3.05, 27),
             (3.3, 28.1), (3.5, 27), (3.68, 27.2), (3.95, 25.2)]
    spin_down_s = 1.2  # time constant of the first fall in engine speed
    powered = curves(speed)[0] * np.exp(-UNPOWERED_S / spin_down_s)
    cycles = turned(np.where(T < COAST[0], powered, slowing(COAST)), COAST[0])
    teeth = cycles * 8 / 3  # tooth passes per engine cycle
    cutting = cutter(teeth) + chops(teeth) + knocks() + arm() + clanks() + brushing()
    motor = engine(cycles) + chuffs(cycles) + coasting(cycles) + loose_parts(cycles)
    return cutting + motor + pulley() + squeal() + shudder() + garden()


def record(dry):
    """The recorder keeps nothing above its band limit."""
    top_hz = 16000
    m = next_fast_len(N + 8192)
    return irfft(rfft(dry, m) * (np.fft.rfftfreq(m, 1 / SR) < top_hz), m)[:, :N]


dry = scene()
out = record(dry)
transcribe(out)
```